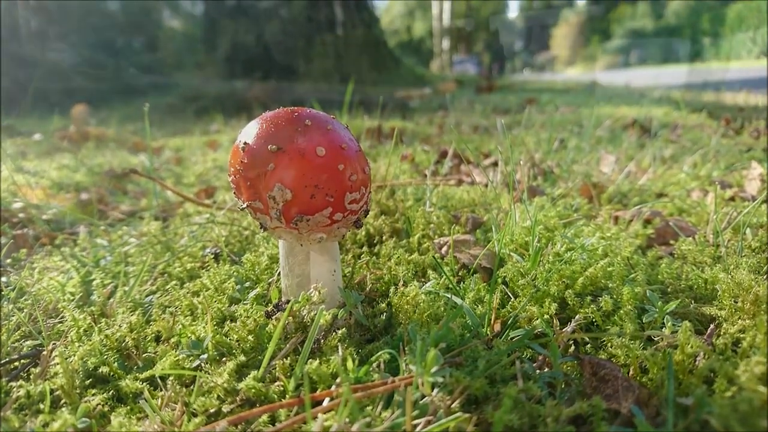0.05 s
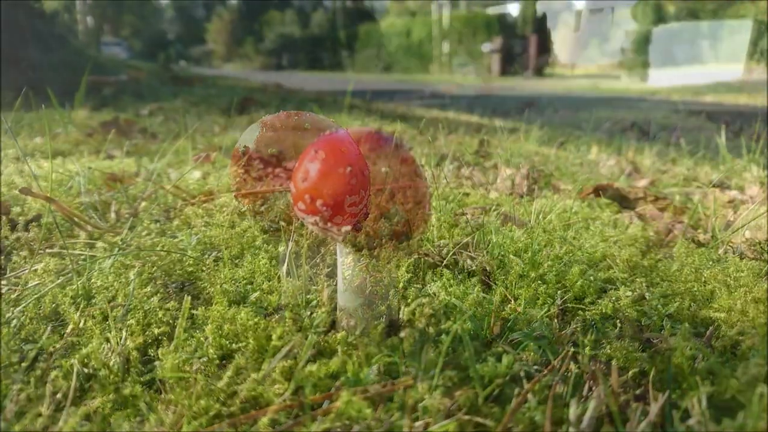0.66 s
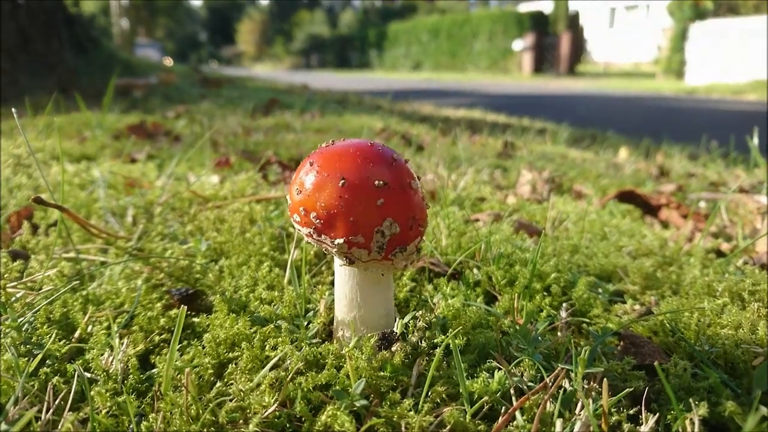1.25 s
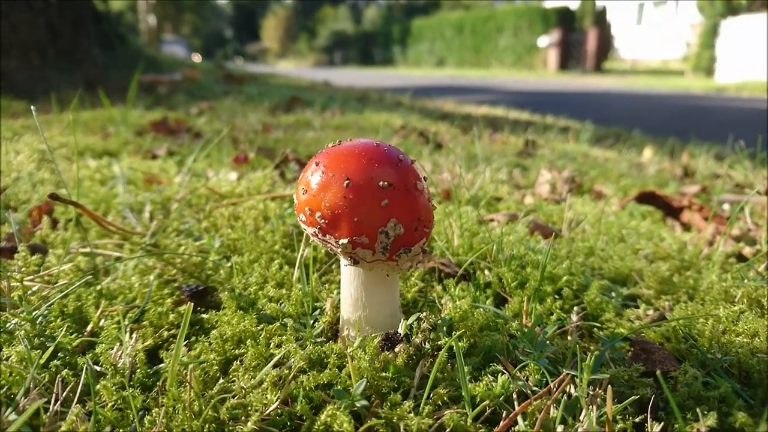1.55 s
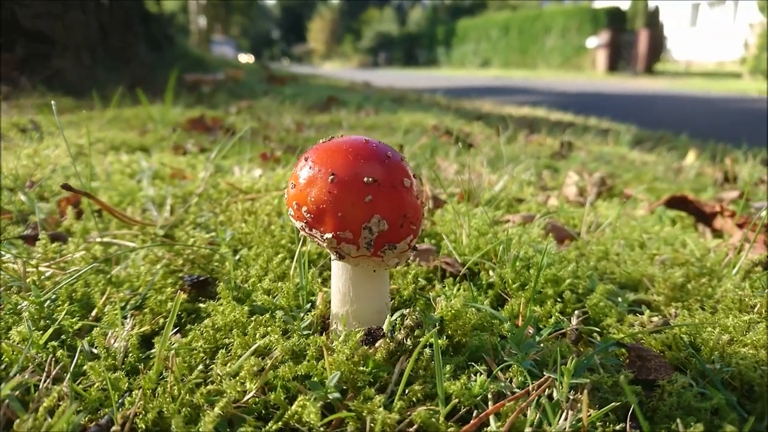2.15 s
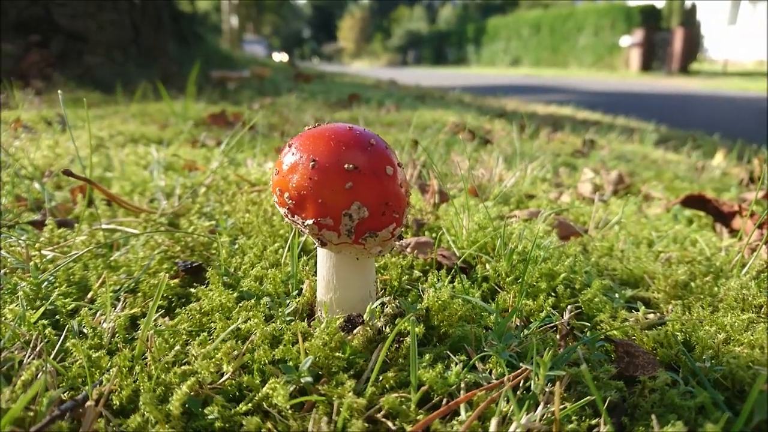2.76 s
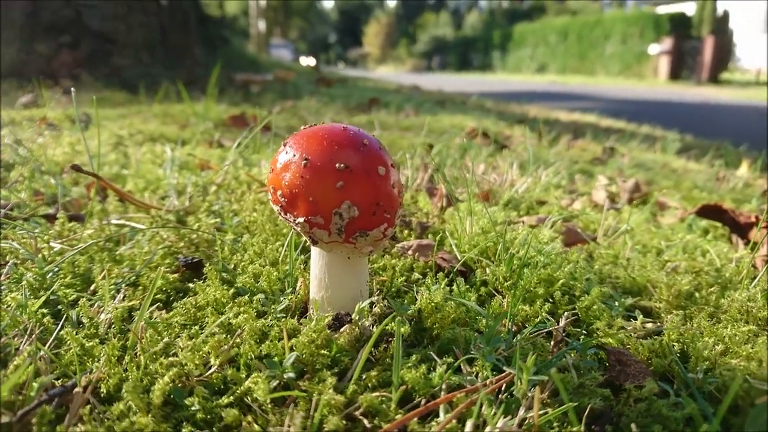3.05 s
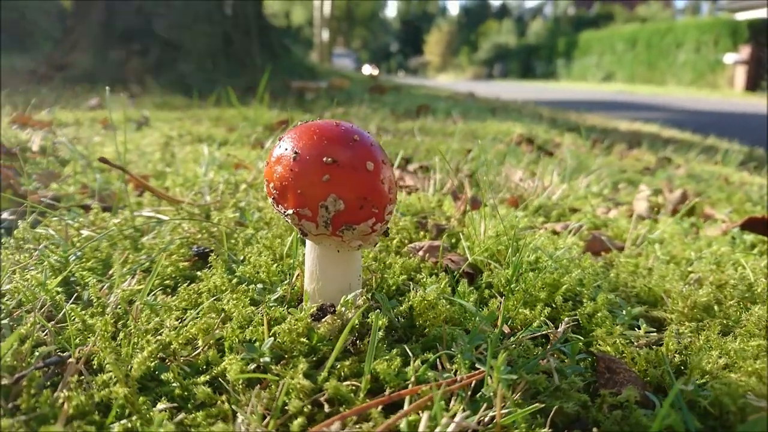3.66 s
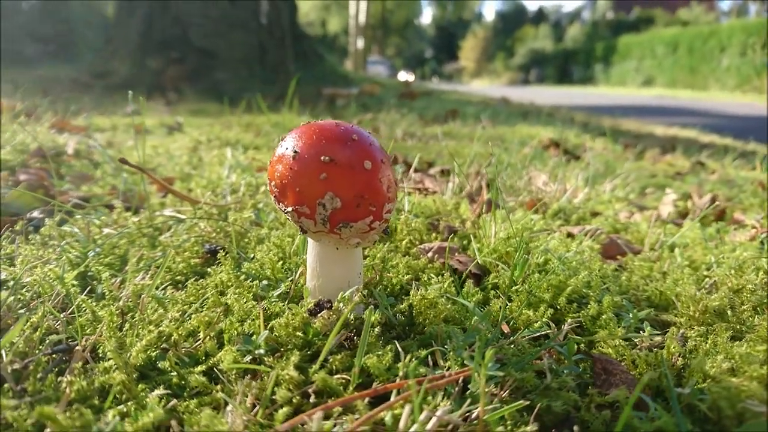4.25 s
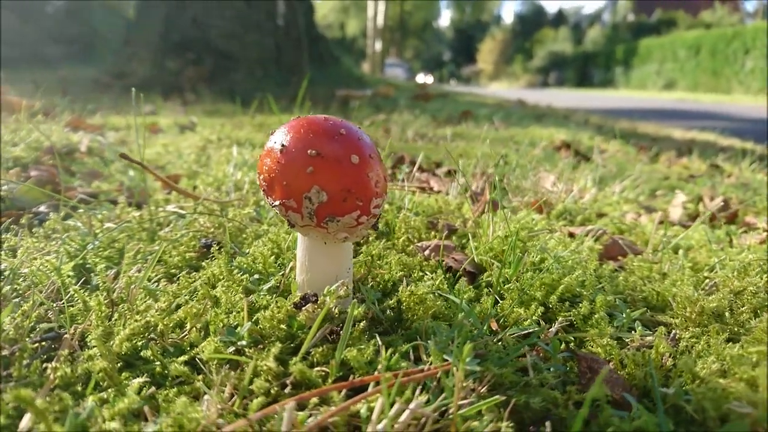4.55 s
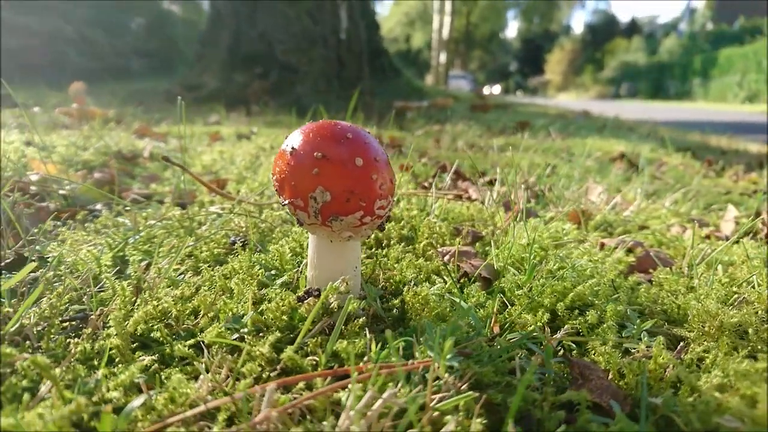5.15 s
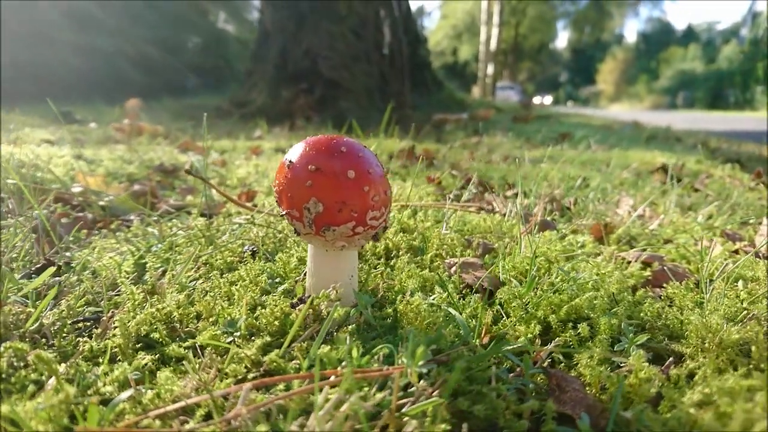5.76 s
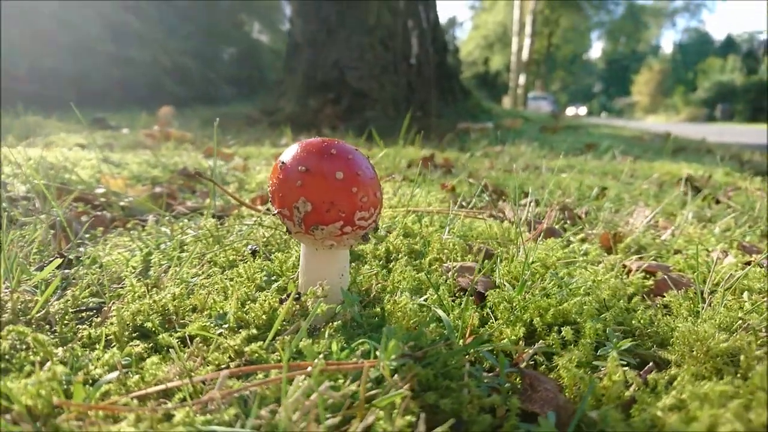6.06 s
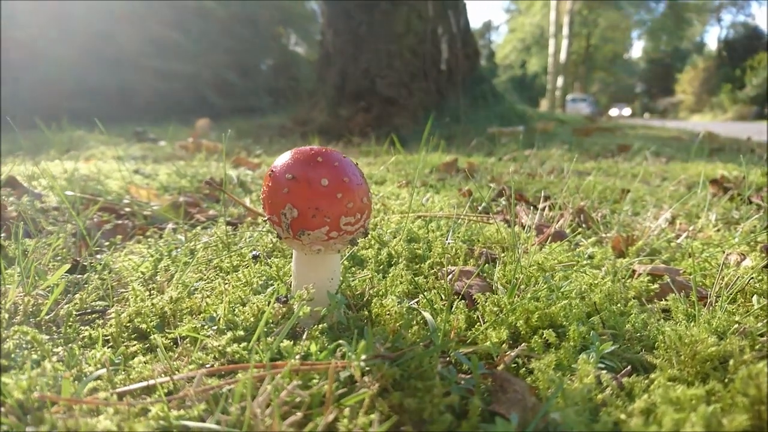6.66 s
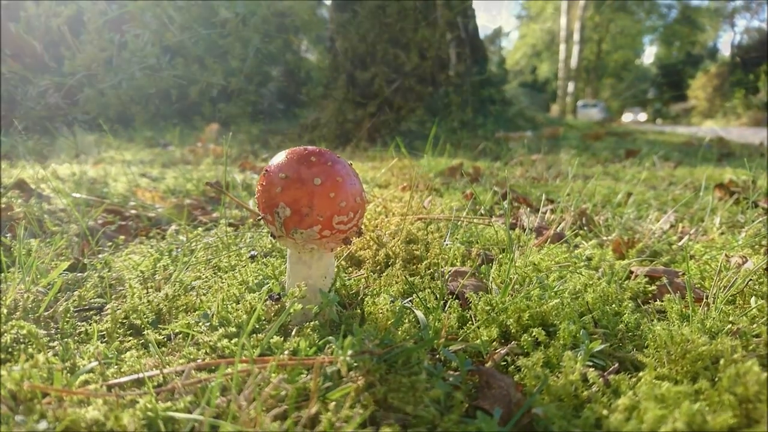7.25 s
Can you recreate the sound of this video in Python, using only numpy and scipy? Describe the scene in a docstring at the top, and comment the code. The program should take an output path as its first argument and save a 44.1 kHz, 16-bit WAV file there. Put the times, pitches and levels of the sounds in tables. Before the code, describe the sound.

A small camera is pushed through moss and grass outdoors, so the plants scrape directly over its microphone. After a quiet instant, crisp crackling and tiny stem snaps begin on the right, with a brief crunch and one sharp crack early on. The rustling continues in uneven pushes over a dull rumble and soft bumps, spreading to both sides later. A road hums very faintly far away.

```python
"""Camera sliding through a lawn.

Moss and grass scrape and snap on a small camera's two microphone ports, first on the right, later
on both. Friction is a stream of tiny slips; each snap is a volley of cracks that rings the port.
The case rubs and bumps over the ground, a dull rumble in both microphones. A road hums far off."""
import sys
import numpy as np
from scipy import signal
from scipy.fft import rfft, irfft
from scipy.io import wavfile
from scipy.ndimage import uniform_filter1d

SR = 44100
rng = np.random.default_rng(int(sys.argv[2]) if len(sys.argv) > 2 else 0)


def persist_wave(psi):
    """Save psi, clipped to +-1, as 16-bit WAV."""
    counts = np.round(np.clip(psi, -1, 1) * 32767).astype(np.int16)
    wavfile.write(sys.argv[1], SR, np.atleast_2d(counts).T)


N = 322223
TIME = np.arange(N) / SR


def from_db(db):
    """Decibels to gain."""
    return 10 ** (np.asarray(db) / 20)


def unit_rms(x):
    """Scale to an rms of 1."""
    return x / np.sqrt(np.mean(x ** 2) + 1e-20)


def curve(rows):
    """Interpolate (time, value) rows at every sample."""
    return np.interp(TIME, *np.transpose(rows))


def drift(rate_hz):
    """Random wander of unit spread."""
    return np.interp(TIME * rate_hz, np.arange(N // 20), rng.standard_normal(N // 20)) * np.sqrt(3 / 2)


def decay(x, fade_s):
    """Give each impulse an exponential tail."""
    return signal.lfilter([1], [1, -np.exp(-1 / (fade_s * SR))], x + 1e-18)


def swells(starts_s, ends_s, levels_db, rise_db_per_s, fall_db_per_s):
    """Level [dB] of gestures that rise, hold and fall; the strongest counts."""
    t = TIME[::64]
    each = [db - rise_db_per_s * np.maximum(start - t, 0) - fall_db_per_s * np.maximum(t - end, 0)
            for start, end, db in zip(starts_s, ends_s, levels_db)]
    return np.interp(TIME, t, np.max(each, axis=0, initial=-140))


def colour(x, spectrum):
    """Minimum-phase filter with the given spectrum and unit power gain."""
    size = 4096
    hz, db = np.transpose(spectrum)
    bins_hz = np.arange(size // 2 + 1) * SR / size
    gain = unit_rms(from_db(np.interp(np.log(bins_hz + 1), np.log(hz), db)))
    cepstrum = irfft(np.log(gain))[:size // 2]
    cepstrum[1:] *= 2
    response = irfft(np.exp(rfft(cepstrum, size)))
    return signal.oaconvolve(x, response)[:len(x)]


def resonate(x, hz, width_hz):
    """One resonance with unit peak gain."""
    r = np.exp(-np.pi * width_hz / SR)
    poles = [1, -2 * r * np.cos(2 * np.pi * hz / SR), r * r]
    return signal.lfilter([(1 - r * r) / 2, 0, (r * r - 1) / 2], poles, x + 1e-18)


def with_ring(x, hz, width_hz, share=1.0):
    """A sound plus the resonance it excites, at unit rms."""
    return unit_rms(unit_rms(x) + share * unit_rms(resonate(x, hz, width_hz)))


def add_panned(out, time_s, sound, pan_db):
    """Mix in at constant power; pan is left minus right."""
    sides = from_db([[pan_db / 2], [-pan_db / 2]])
    at = int(time_s * SR)
    out[:, at:at + sound.shape[-1]] += (sides / np.linalg.norm(sides) * sound)[:, :N - at]


def impulses(per_s, sizes_db):
    """Randomly timed clicks of either sign, at unit rms."""
    sizes = from_db(sizes_db) * rng.choice([-1, 1], N)
    return unit_rms(sizes * (rng.random(N) < per_s / SR))


def ticks(per_s, spread_db):
    """Single dry fibres flick past: mostly small clicks, a few large."""
    return impulses(per_s, spread_db * np.minimum(rng.exponential(1, N), 2))


def catching(per_s, strength_db, fade_s, flutter_db):
    """Friction gain as fibres catch and let go: decaying jumps on an uneven drag."""
    releases = (rng.random(N) < per_s / SR) * from_db(strength_db * np.minimum(rng.exponential(1, N), 3))
    return (1 + decay(releases, fade_s)) * from_db(flutter_db * (drift(70) + drift(300)))


def slips(per_s, spread_db, catch, hiss):
    """Tiny uneven slips over smooth friction, swelling where fibres catch."""
    clicks = impulses(per_s, spread_db * np.clip(rng.standard_normal(N), -2, 2))
    grains = (clicks + hiss * rng.standard_normal(N)) * catch
    power = uniform_filter1d(grains ** 2, size=2646)  # 60 ms
    return grains / np.sqrt(np.abs(power) + 1e-9)


# Road and open air spectrum: (frequency [Hz], gain [dB])
ROAD_SPECTRUM = [(45, 1), (70, 7.5), (110, 1), (170, -9.5), (250, -13), (380, -4), (600, -4.5), (1100, -10),
                 (1700, -22.5), (4000, -25.5), (7000, -29), (10000, -49)]


def distant_road():
    """Far traffic: alike on both sides in the bass, diffuse above."""
    mid, side = (colour(rng.standard_normal(N), ROAD_SPECTRUM) for _ in range(2))
    side = signal.sosfilt(signal.butter(1, 174, "high", fs=SR, output="sos"), side)
    return from_db(-63.5) * np.array([from_db(-5) * (mid + side), mid - side])


# Engine approach: (time [s], relative level [dB])
ENGINE_APPROACH = [(5.6, -90), (6.6, -63), (7.1, -54.5)]


def distant_engine(firing_hz=70.8, waver_db=2.5):
    """Low firing note of a far car drawing near, right of centre."""
    gain = from_db(curve(ENGINE_APPROACH) + waver_db * drift(7.1))
    note = np.sqrt(2) * np.sin(2 * np.pi * firing_hz * TIME)
    return gain * note * from_db([[-9], [-3]])


# Case rumble spectrum: (frequency [Hz], gain [dB])
CASE_SPECTRUM = [(25, -8), (55, -9), (110, 1), (190, -2), (280, 0.5), (370, 2), (480, -2.5), (700, -4),
                 (1100, -11), (5000, -75)]


def case_rumble(rumble_db, pan_db, shared_power=0.91, left_delay_s=0.0003):
    """The case judders over the ground; both microphones feel most of it alike, the left later."""
    catch = catching(per_s=40, strength_db=-5.5, fade_s=0.005, flutter_db=1.0)
    shared, left, right = (colour(slips(per_s=1500, spread_db=5.0, catch=catch, hiss=0.24), CASE_SPECTRUM)
                           for _ in range(3))
    delayed = np.interp(TIME - left_delay_s, TIME, shared)
    left = np.sqrt(shared_power) * delayed + np.sqrt(1 - shared_power) * left
    right = np.sqrt(shared_power) * shared + np.sqrt(1 - shared_power) * right
    return from_db(rumble_db - 2.5) * np.array([from_db(pan_db) * left, right])


# Soft thud spectrum: (frequency [Hz], gain [dB])
THUD_SPECTRUM = [(40, -7), (100, 0.5), (190, -1), (410, 5), (540, -6.5), (1100, -13), (4000, -61)]
# Case hitting the ground: (time [s], relative level [dB], ring [Hz], pan [dB])
CASE_BUMPS = [(2.18, -36.5, 123, -1), (2.313, -36.5, 129, -2), (2.343, -32, 355, -1),
              (2.358, -34, 233, -12), (2.373, -31.5, 317, 3), (2.468, -41, 330, 1), (2.575, -43, 266, -4),
              (3.228, -35, 290, -5), (3.415, -37.5, 280, -11), (4.439, -37.5, 285, -8),
              (4.663, -40, 91.5, 8), (5.634, -43, 147, -5), (5.917, -50, 362, 2), (6.104, -34.5, 362, -5),
              (6.193, -35, 182, -12), (6.315, -32, 216, -12), (6.329, -37, 170, -10),
              (6.391, -35.5, 200, -11), (6.775, -34, 297, -10), (6.8, -31.5, 325, -10)]


def case_bumps(impact_s=0.0003, scuff_s=0.023):
    """The case lands in the moss with a damped thud and scuffs on a little."""
    out, t = np.zeros((2, N)), np.arange(4096) / SR
    for time_s, db, ring_hz, pan_db in CASE_BUMPS:
        scuff = from_db(-7.5) * np.exp(-t / scuff_s) * rng.standard_normal(len(t))
        force = np.exp(-t / impact_s) + scuff
        thud = with_ring(colour(force, THUD_SPECTRUM), ring_hz, width_hz=58)
        add_panned(out, time_s, from_db(db - 14) * thud, pan_db)
    return out


def brushing(level_db, spectrum, flutter_db):
    """Fine friction of something soft that sticks and slides."""
    catch = from_db(flutter_db * np.clip(drift(260), -2, 2))
    return from_db(level_db) * colour(slips(per_s=3500, spread_db=8.0, catch=catch, hiss=0.6), spectrum)


# Soft moss spectrum: (frequency [Hz], gain [dB])
MOSS_SPECTRUM = [(200, -21), (400, 1.5), (560, 3), (850, 2), (1200, -8), (2000, -29), (4000, -68)]
# Moss strokes: (start [s], end [s], level [dB])
MOSS_STROKES = [(0.502, 0.6, -57.5), (0.606, 1.468, -52), (2.227, 2.245, -43.5), (4.445, 4.484, -48),
                (6.79, 6.815, -48)]


def moss_scuffs():
    """Soft moss scuffs the case near the right port."""
    level_db = swells(*np.transpose(MOSS_STROKES), rise_db_per_s=500, fall_db_per_s=156)
    return brushing(level_db, MOSS_SPECTRUM, flutter_db=7.5)


# Grass blade spectrum: (frequency [Hz], gain [dB])
BLADE_SPECTRUM = [(3500, -48), (4400, -4.5), (5600, 0), (6900, -0.5), (7700, -16), (9200, -26.5)]
# Blade strokes: (start [s], end [s], level [dB])
BLADE_STROKES = [(4.26, 4.288, -46), (4.38, 4.46, -44)]


def blade_swish():
    """A smooth blade slides along the right port, then slowly slips off."""
    level_db = swells(*np.transpose(BLADE_STROKES), rise_db_per_s=130, fall_db_per_s=33)
    return brushing(level_db, BLADE_SPECTRUM, flutter_db=3.0)


# Dense tufts: (start [s], length [s], right level [dB], left level [dB])
DENSE_TUFTS = [(1.651, .026, -43.5, -80), (1.832, .004, -43, -76), (2.14, 0.032, -42.5, -71),
               (2.328, 0.058, -43.5, -77), (3.392, .02, -46, -64), (3.507, 0.015, -44.5, -42),
               (3.832, 0.021, -42, -64), (3.942, .006, -51, -53), (4.002, 0.0066, -42.5, -44.5),
               (5.956, 0.019, -41.5, -49), (6.535, 0.024, -42.5, -45.5), (6.886, 0.041, -42.5, -45.5),
               (7.192, .05, -51.5, -64)]


def tuft_drag():
    """Right and left friction [dB] as tufts drag briefly over the ports."""
    start, length, right_db, left_db = np.transpose(DENSE_TUFTS)
    return (swells(start, start + length, right_db, rise_db_per_s=1200, fall_db_per_s=605),
            swells(start, start + length, left_db, rise_db_per_s=1200, fall_db_per_s=1300))


# Pushes through moss: (start [s], end [s], crackle [dB], scrape [dB], rumble [dB], rumble pan [dB])
HAND_PUSHES = [(0.59, 1.324, -50.5, -49.5, -49.5, -8), (1.395, 1.438, -52, -43.5, -54.5, -9),
               (1.656, 1.942, -55, -52.5, -64, -7), (2.102, 2.442, -49, -50.5, -50, -3),
               (2.45, 2.503, -50, -55.5, -53, -5), (2.522, 2.637, -52.5, -55, -57, -6),
               (2.767, 2.896, -52.5, -56.5, -56, -5), (2.944, 3.154, -47, -52, -55, 0),
               (3.203, 3.567, -44, -48.5, -54, -3.5), (3.673, 3.99, -48, -51, -61, -3),
               (4.39, 4.535, -53, -50, -49.5, -4.5), (4.62, 5, -53.5, -53.5, -58, -2.5),
               (5.12, 5.435, -52, -54, -70, -5.5), (5.7, 5.907, -50, -51, -53, -7),
               (5.945, 6.56, -45.5, -49, -48, -6.5), (6.687, 6.91, -50.5, -51.5, -47, -8),
               (6.92, 7.089, -48, -50, -51, -2)]
# Hand easing off, negative for more drag: (time [s], drop [dB])
HAND_LIFTS = [(0.885, 6), (1.209, 3), (1.345, 9.5), (1.55, 4), (2.01, 2.5), (2.68, 5.5), (3.9, 4.5),
              (4.12, 5), (5.521, -4), (6.64, -3.5), (7.16, 0.5)]
# Grass touching the left port: (time [s], crackle [dB])
LEFT_CONTACT = [(0.36, -85), (2.85, -88), (3.2, -65.5), (3.5, -57), (4.0, -67.5), (4.15, -77), (4.45, -67),
                (4.9, -60), (5.38, -56), (5.52, -65), (5.75, -55.5), (6.42, -49), (6.56, -52.5), (6.7, -62),
                (6.82, -61), (6.9, -49), (7.05, -57.5), (7.2, -78)]


def contact(touchdown_s=0.372, settled_s=0.82, resting_db=-58, lift_s=0.023):
    """Friction levels and rumble pan [dB]: the camera lands, is pushed, and rests between pushes."""
    start, end, *push_levels, pan_db = np.transpose(HAND_PUSHES)
    slopes = dict(rise_db_per_s=94, fall_db_per_s=110)
    resting = swells([settled_s], [TIME[-1]], [resting_db], **slopes)
    ground = np.where(TIME < touchdown_s, -30, 0) + 1.44 * drift(22)
    eased = sum(drop * np.exp(-((TIME - s) / lift_s) ** 2) for s, drop in HAND_LIFTS)
    crackle, scrape, rumble = (np.maximum(swells(start, end, db, **slopes), resting) + ground
                               for db in push_levels)
    right_tufts, left_tufts = tuft_drag()
    return (np.maximum(crackle - eased, right_tufts),
            np.maximum(scrape - eased, right_tufts - 4),
            np.maximum(curve(LEFT_CONTACT) + ground, left_tufts),
            rumble - 0.71 * eased,
            np.interp(TIME, (start + end) / 2, pan_db))


# Sharp splinter spectrum: (frequency [Hz], gain [dB])
SPLINTER_SPECTRUM = [(3000, -52), (6500, 7), (8800, 9.5), (10500, -5.5), (12300, -6.5), (14500, -1.5)]


def splinters(level_db):
    """Bright sizzle of dry fibres as the camera digs into the grass."""
    catch = catching(per_s=46, strength_db=-1.0, fade_s=0.0016, flutter_db=3.0)
    sizzle = slips(per_s=1700, spread_db=18.0, catch=catch, hiss=0.23)
    return from_db(level_db) * colour(sizzle, SPLINTER_SPECTRUM)


# Left port crackle spectrum: (frequency [Hz], gain [dB])
LEFT_SPECTRUM = [(300, 5.5), (1100, 3.5), (1600, 6), (2600, 10), (3350, 6), (4100, 6), (5100, 4.5),
                 (5900, 4), (6600, 10.5), (7550, 2), (8400, 6.5), (9100, 8), (10000, -0.5), (11000, 4.5),
                 (12100, -9), (13800, 4), (15500, -1)]


def left_port(level_db):
    """Moss brushes the left port: fine hiss with slight catches and dry ticks."""
    catch = catching(per_s=45, strength_db=4.5, fade_s=0.0009, flutter_db=2.2)
    clicks = from_db(-9.5) * ticks(per_s=36, spread_db=7)
    friction = slips(per_s=6000, spread_db=4.0, catch=catch, hiss=0.9)
    return from_db(level_db) * colour(friction + clicks, LEFT_SPECTRUM)


# Right port crackle spectrum: (frequency [Hz], gain [dB])
RIGHT_SPECTRUM = [(2000, -22), (3200, -6.5), (4300, 2.5), (5500, 0.5), (7100, 2), (8200, -6), (9300, -13.5),
                  (11500, -22.5), (13000, -19.5), (14700, -8.5), (16000, -18)]
# Dull scrape spectrum: (frequency [Hz], gain [dB])
SCRAPE_SPECTRUM = [(120, -11.5), (350, -5.5), (600, -1), (1000, 0.5), (1600, 1), (2550, 2), (3200, -4),
                   (5000, -4), (10000, -72)]
PORT_LOW_HZ, PORT_HIGH_HZ = 4370, 6900


def right_port(crackle_db, scrape_db):
    """Moss drags over the right port; the same catches drive crisp crackle and dull scrape."""
    catch = catching(per_s=130, strength_db=6.0, fade_s=0.0011, flutter_db=1.5)
    crisp = colour(slips(per_s=5700, spread_db=4.5, catch=catch, hiss=0.13), RIGHT_SPECTRUM)
    for hz in (PORT_LOW_HZ, PORT_HIGH_HZ):  # each touch favours one resonance
        crisp += (from_db(3.1 * drift(110)) - 1) * resonate(crisp, hz, width_hz=670)
    dull = colour(slips(per_s=3000, spread_db=3.5, catch=catch ** 0.73, hiss=0.57), SCRAPE_SPECTRUM)
    for hz in (1100, 2300):  # stalks differ in stiffness
        dull += 0.21 * drift(45) * resonate(dull, hz, width_hz=1300)
    return from_db(crackle_db + 0.3) * crisp + from_db(scrape_db + 0.22) * dull


def hollowed(x, crackle_db, below_db=-49.5):
    """A light touch sounds hollow: the less drag, the deeper the notch."""
    depth = np.clip(0.065 * (below_db - crackle_db), 0, 0.7)
    return x - depth * resonate(x, hz=3400, width_hz=800)


def fibre_ticks(level_db):
    """Lone fibres flick the right port, far shorter than a snap."""
    clicks = ticks(per_s=18, spread_db=13.0)
    bright = from_db(-2) * colour(clicks, SPLINTER_SPECTRUM)
    return from_db(level_db) * (bright + colour(clicks, RIGHT_SPECTRUM))


# Crushed tuft envelope: (time [s], level [dB])
CRUNCH_ENVELOPE = [(1.34, -70), (1.375, -46), (1.47, -35.5), (1.53, -56.5), (1.58, -63), (1.62, -50),
                   (1.66, -50.5), (1.73, -40.5), (1.8, -78)]


def moss_crunch(stalks_per_s=160):
    """A tuft is crushed on the right port; its stalks give way one after another."""
    stalk_count = np.floor(np.cumsum(stalks_per_s * from_db(1.5 * drift(150))) / SR)
    breaks = np.diff(stalk_count, prepend=0)
    sizes = from_db(7.5 * np.clip(rng.standard_normal(N), -2, 2))
    bursts = decay(breaks * sizes, fade_s=0.0014) * rng.standard_normal(N)
    crunch = with_ring(colour(bursts, RIGHT_SPECTRUM), PORT_LOW_HZ, width_hz=560)
    touching = (TIME >= CRUNCH_ENVELOPE[0][0]) & (TIME <= CRUNCH_ENVELOPE[-1][0])
    return touching * from_db(curve(CRUNCH_ENVELOPE)) * crunch


def thin_stems(crackle_db, per_s=10, dull_db=-4.5, pan_db=-45, length_s=0.00052):
    """Snap rows for thin stems that give way at random, harder under firmer drag."""
    rows = []
    for when, size, pitch in rng.random((int(per_s * N / SR), 3)):
        db = crackle_db[int(when * N)] + 3 + 6 * size
        ring_hz = PORT_LOW_HZ + pitch * (PORT_HIGH_HZ - PORT_LOW_HZ)
        rows.append((when * TIME[-1], db, ring_hz, dull_db, pan_db, length_s))
    return rows


# Loudest snaps: (time [s], relative level [dB], ring [Hz], dull part [dB], pan [dB], length [s])
LOUD_SNAPS = [(0.611, -29, 7200, -10, -36, 0.0004), (0.633, -31, 7000, -16, -36, 0.00039),
              (0.678, -34, 4370, 0, -36, 0.00072), (0.73, -28, 4470, -12, -32, 0.0046),
              (0.806, -26.5, 3800, -8, -37, 0.00037), (0.815, -24, 7000, -6, -41, 0.0027),
              (0.8305, -30, 7060, -22, -35, 0.0018), (0.8533, -24.5, 4060, 0, -34, 0.0021),
              (0.893, -29.5, 3900, -2, -37, 0.00079), (0.969, -31.5, 7100, -21, -36, .003),
              (0.998, -32.5, 7540, -14, -36, .0015), (1.037, -32, 4100, 2, -36, 0.0018),
              (1.101, -28, 4460, -3, -41, 0.0023), (1.137, -34.5, 4070, -13, -36, 0.001),
              (1.1564, -33, 7000, -8, -36, 0.0012), (1.1704, -29, 7300, -7, -35, 0.00068),
              (1.242, -34.5, 7100, -6, -35, 0.00058), (1.3628, -24.5, 4050, -7, -46, 0.00077),
              (1.382, -28, 4100, 0, -42, 0.0026), (1.4496, -25.5, 4570, -4, -42, 0.0015),
              (1.566, -31.5, 4300, -10, -35, 0.0028), (1.65, -29, 4570, -17, -42, 0.0063),
              (1.7429, -13.5, 6000, -5.5, -39, 0.0015), (1.748, -27, 5500, -15, -39, 0.0044),
              (1.753, -30, 5380, -7, -39, 0.0014), (1.7696, -29, 5340, -20, -39, 0.0042),
              (1.919, -28.5, 4970, -5.5, -39, 0.00089), (1.964, -36, 4730, -4.5, -40, 0.00067),
              (2.094, -30, 4740, -28, -39, 0.00037), (2.145, -24.5, 4800, -3.5, -43, 0.0022),
              (2.201, -32, 7450, -18, -30, 0.00084), (2.343, -28.5, 5200, -2, -39, 0.0047),
              (2.505, -32.5, 6700, -25, -37, 0.0011), (2.5755, -27.5, 4870, -1, -37, 0.0044),
              (2.769, -29, 7260, -17, -35, 0.005), (2.898, -29, 5600, -11, -40, 0.0034),
              (2.931, -33, 7000, -20, -35, .0008), (2.976, -30.5, 4610, -9, -35, 0.0019),
              (3.093, -26, 7260, -22, -31, 0.003), (3.146, -23.5, 5300, -10, -41, 0.0093),
              (3.304, -28.5, 6890, -14, -20, .001), (3.334, -26, 7000, -28, -37, 0.0041),
              (3.377, -22.5, 7600, -28, -42, 0.0011), (3.402, -26.5, 7400, -24, -35, 0.0033),
              (3.4138, -24.5, 7640, -2, -9, 0.0011), (3.476, -32, 6390, -8, -20, .001),
              (3.607, -33.5, 6500, -10, 2, 0.00044), (3.769, -26, 5440, -10, -35, .0008),
              (3.922, -24.5, 4260, -13, -28, 0.0021), (4.0297, -21, 5300, -24, -36, 0.0015),
              (4.251, -29, 5250, -10.5, -37, 0.00074), (4.263, -31, 5800, -20, -29, .002),
              (4.683, -37.5, 6670, -20, -22, .001), (4.77, -37, 7600, -20, -13, .0005),
              (4.818, -26, 5460, -11, -31, 0.00047), (5.101, -38, 6900, -16, -16, 0.00092),
              (5.183, -36.5, 6500, -6, 5, .0004), (5.333, -31, 7010, -22, 7, 0.0028),
              (5.369, -29.5, 6230, -3, -21, 0.0024), (5.6357, -31.5, 7100, 2, -30, .0014),
              (5.839, -31.5, 6500, -10, -2, 0.0007), (5.883, -27.5, 3770, -4, -26, 0.0031),
              (5.9186, -21.5, 4000, -2, -29, 0.0016), (5.946, -25, 6800, 6, -31, 0.00089),
              (6.116, -25, 6600, -2, -5, 0.0015), (6.161, -31, 4460, 2, -9, 0.0034),
              (6.274, -28, 6440, -11, -6, 0.0017), (6.3105, -21.5, 3880, -8.5, -30, 0.00052),
              (6.368, -35, 6900, -14, -5, .001), (6.415, -20, 7000, -10, -3, 0.0013),
              (6.4358, -20.5, 6500, -4, -14, 0.0017), (6.5007, -20, 4100, -4, -29, 0.0014),
              (6.5307, -21, 4440, -9, -11, 0.0022), (6.5404, -26, 6310, 2, -7, 0.00086),
              (6.6037, -27.5, 6500, -28, -9, 0.00089), (6.6455, -29, 7100, -22, -8, 0.00066),
              (6.7407, -25, 6360, -27, -10, 0.0011), (6.866, -28, 6540, -24, -3, .001),
              (6.893, -26, 6940, -4, -14, 0.0032), (6.907, -29.5, 6660, -20, -5, 0.00067),
              (7.081, -34, 4970, -14, -25, .001), (7.113, -30.5, 4640, -11, -23, .0008),
              (7.211, -37, 6500, -5, -9, .0006), (7.229, -36, 4500, -16, -20, 0.0018)]


def stem_snaps(crackle_db, quiver_s=0.017):
    """Each stem lets go in a volley of cracks that rings the port and jolts the case, then quivers."""
    out, t = np.zeros((2, N)), np.arange(1024) / SR
    jolt = unit_rms(colour(np.where(t == 0, 1., 0.), WOOD_SPECTRUM))
    quiver = from_db(-22.5) * np.exp(-t / quiver_s)
    for time_s, db, ring_hz, dull_db, pan_db, length_s in list(LOUD_SNAPS) + thin_stems(crackle_db):
        burst = np.exp(-(t / length_s - 0.5) ** 2)
        cracks = rng.standard_normal(len(t)) * rng.exponential(1, len(t))
        volley = (burst + quiver) * cracks
        crisp = with_ring(colour(volley, RIGHT_SPECTRUM), ring_hz, width_hz=490, share=1.22)
        dull = woody_body(volley, jolt)
        sharp = unit_rms(colour(burst * rng.standard_normal(len(t)) ** 3, SPLINTER_SPECTRUM))
        sharp_db = -4 + 0.86 * (db + 13.5)  # harder snaps splinter more
        right = unit_rms(crisp + from_db(dull_db) * dull + from_db(sharp_db) * sharp)
        left = unit_rms(colour(volley, LEFT_SPECTRUM))
        add_panned(out, time_s, from_db(db - 14.5) * np.array([left, right]), pan_db)
    return out


# Woody snap spectrum: (frequency [Hz], gain [dB])
WOOD_SPECTRUM = [(60, -14), (130, -1), (500, 0.5), (1100, 1.5), (2200, 3), (3200, -4.5), (5000, -24),
                 (10000, -66)]


def woody_body(volley, jolt):
    """Dull part of a snap: woody cracks plus the jolt of the case."""
    return unit_rms(unit_rms(colour(volley, WOOD_SPECTRUM)) + 0.86 * jolt)


def stem_bending(drop_db=2.5, lead_s=0.005):
    """Drag gain: before a loud snap the bending stem holds other fibres off the port."""
    marks = np.zeros(N)
    marks[[int(snap[0] * SR) for snap in LOUD_SNAPS]] = 1
    ahead = decay(marks[::-1], lead_s)[::-1]
    return from_db(-drop_db * np.minimum(ahead, 1))


def scene():
    """Port friction, snaps and case noise over the quiet outdoors."""
    crackle_db, scrape_db, left_db, rumble_db, rumble_pan_db = contact()
    left = left_port(left_db) + splinters(left_db - 22)
    right = stem_bending() * hollowed(right_port(crackle_db, scrape_db), crackle_db)
    right += splinters(np.maximum(left_db - 7, crackle_db - 43))
    right += fibre_ticks(crackle_db - 19)
    right += blade_swish() + moss_scuffs() + moss_crunch()
    case = case_rumble(rumble_db, rumble_pan_db) + case_bumps()
    outdoors = distant_road() + distant_engine()
    return outdoors + case + np.array([left, right]) + stem_snaps(crackle_db)


def record(dry):
    """The microphones drop the deepest bass; the top is cut steeply."""
    low_cut = signal.butter(4, 42, "high", fs=SR, output="sos")
    high_cut = signal.ellip(10, 0.2, 70, 16000, fs=SR, output="sos")
    return signal.sosfilt(high_cut, signal.sosfilt(low_cut, dry))


dry = scene()
out = record(dry)
persist_wave(out)
```